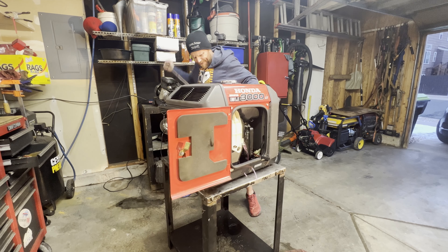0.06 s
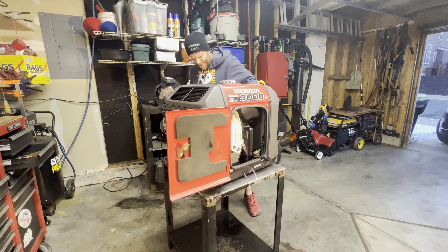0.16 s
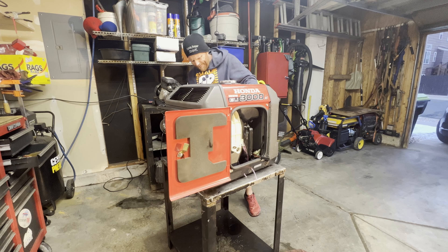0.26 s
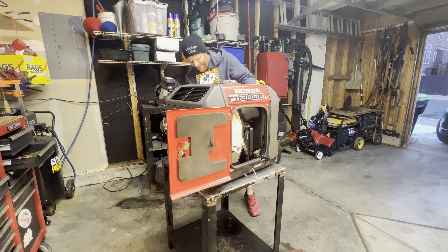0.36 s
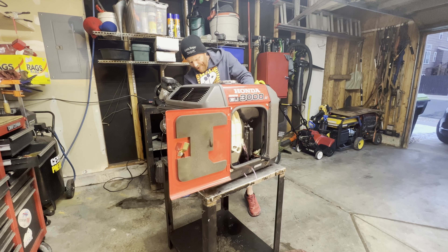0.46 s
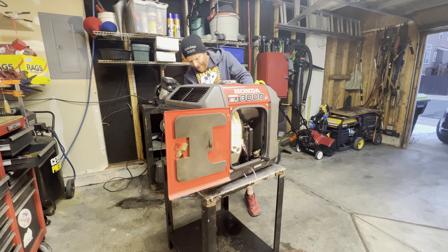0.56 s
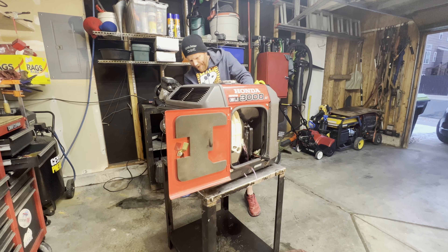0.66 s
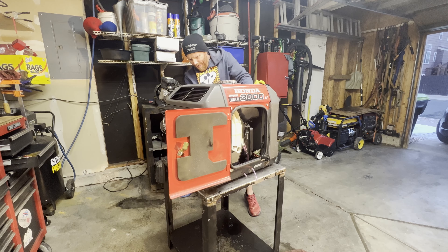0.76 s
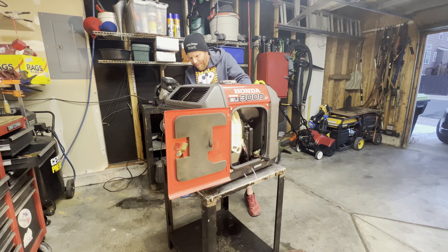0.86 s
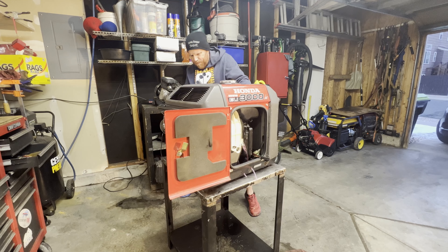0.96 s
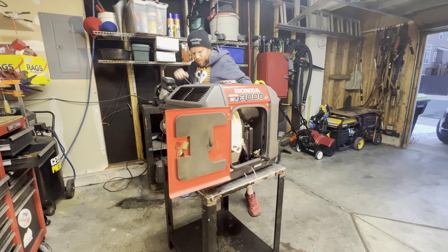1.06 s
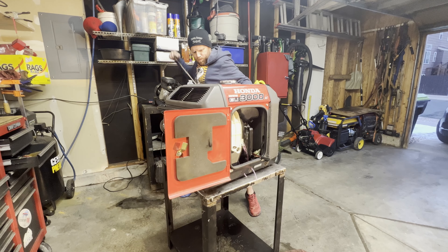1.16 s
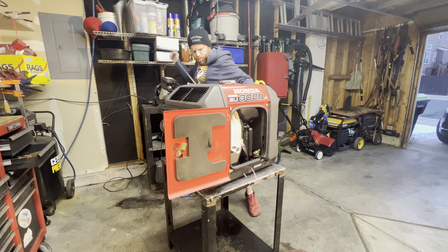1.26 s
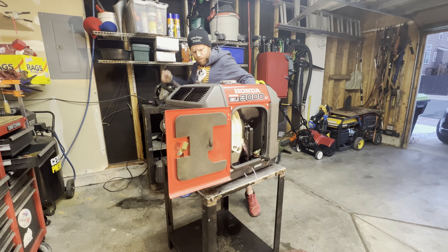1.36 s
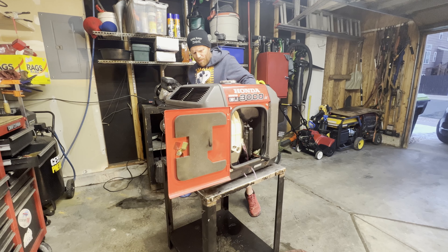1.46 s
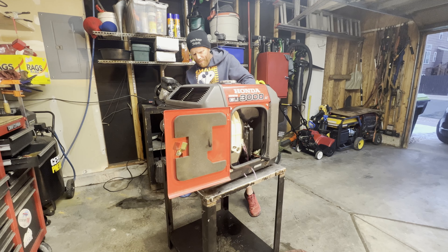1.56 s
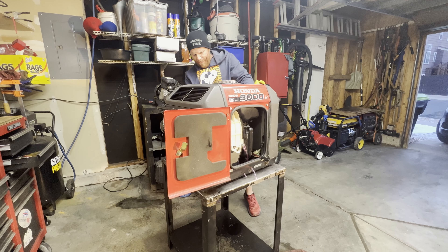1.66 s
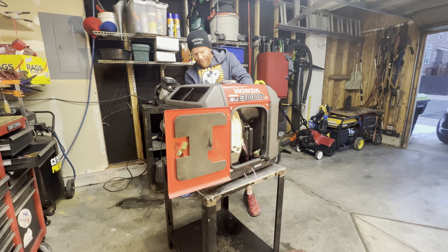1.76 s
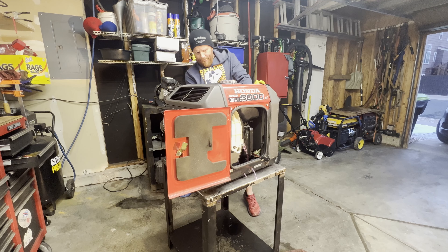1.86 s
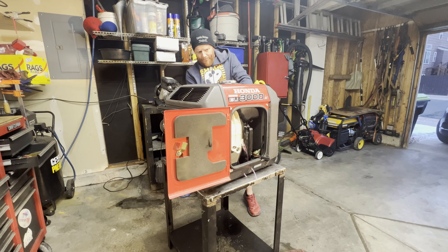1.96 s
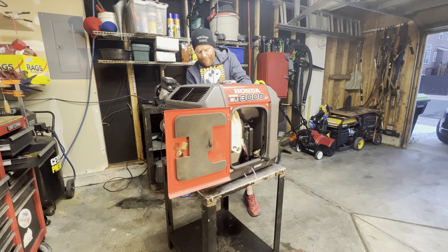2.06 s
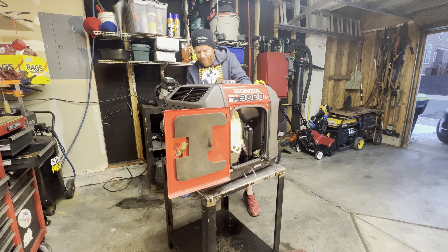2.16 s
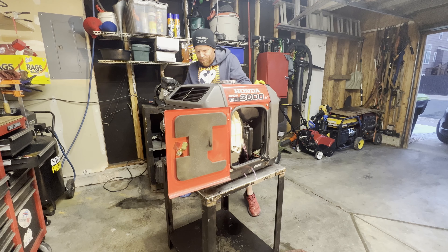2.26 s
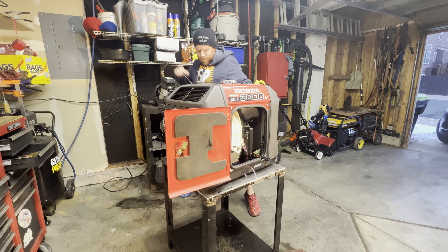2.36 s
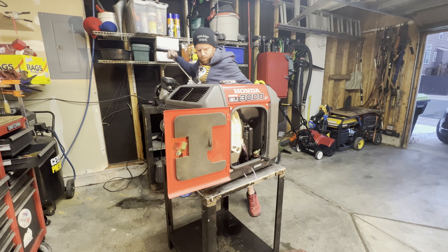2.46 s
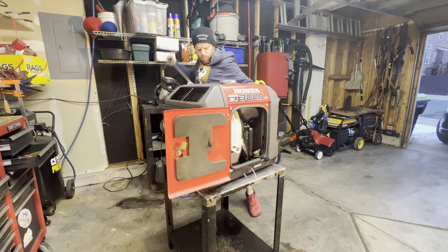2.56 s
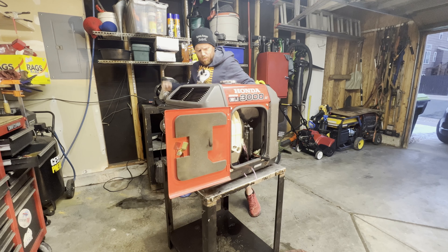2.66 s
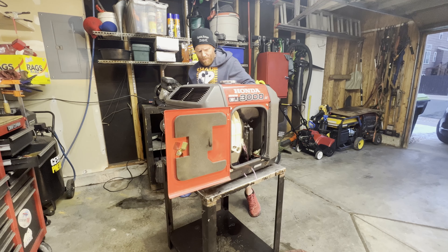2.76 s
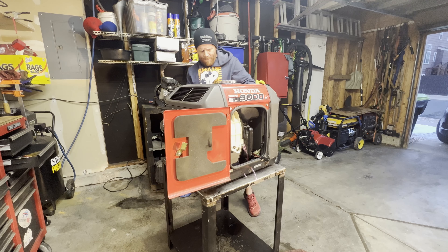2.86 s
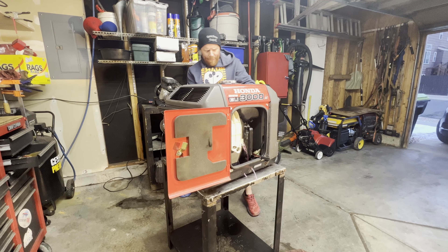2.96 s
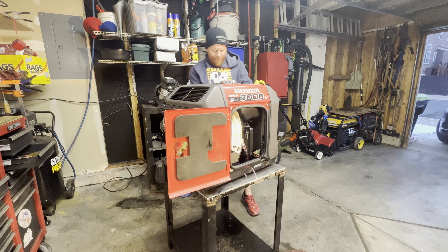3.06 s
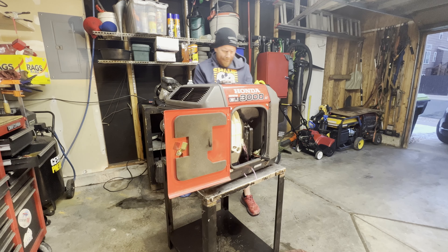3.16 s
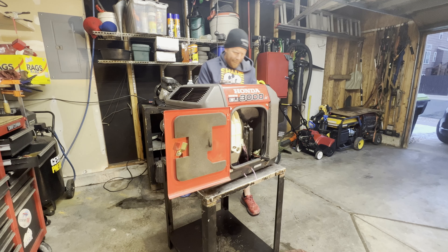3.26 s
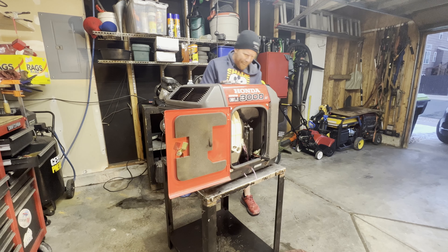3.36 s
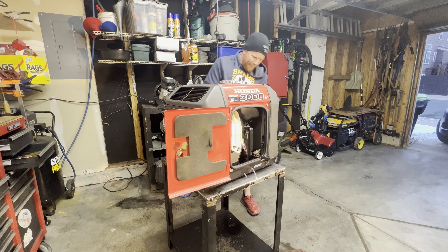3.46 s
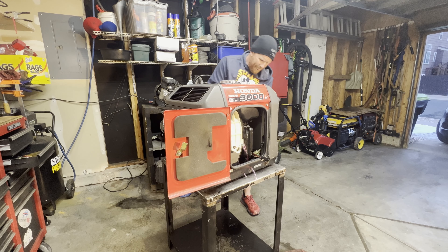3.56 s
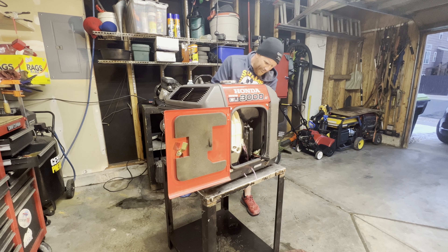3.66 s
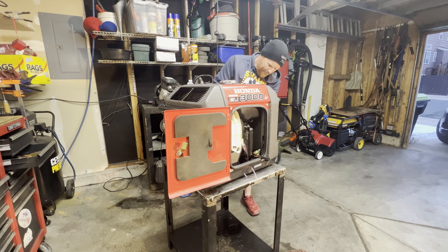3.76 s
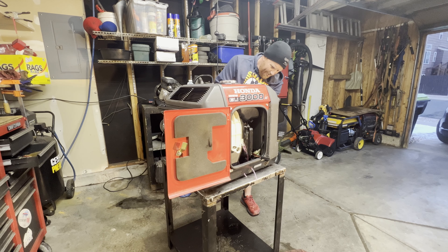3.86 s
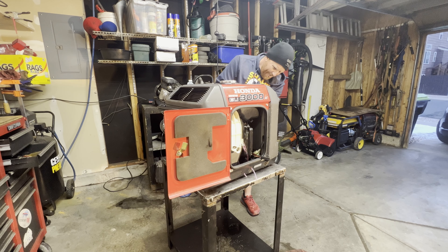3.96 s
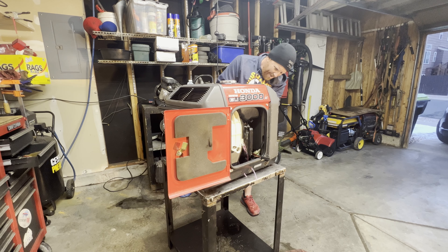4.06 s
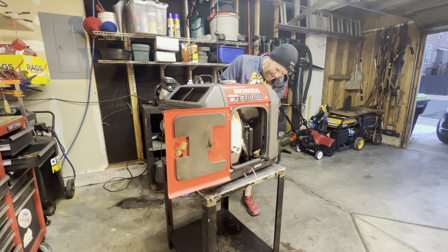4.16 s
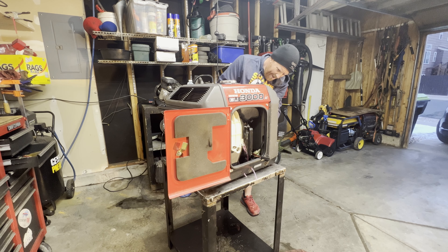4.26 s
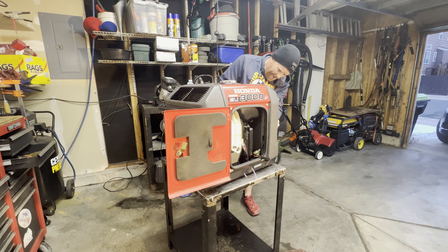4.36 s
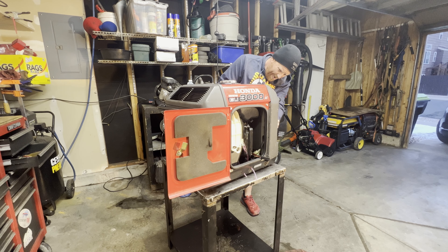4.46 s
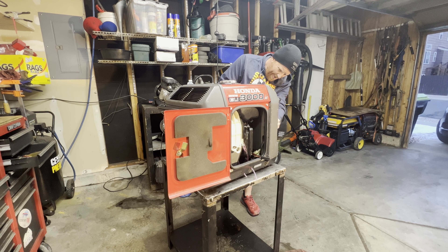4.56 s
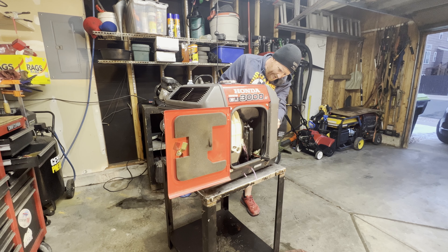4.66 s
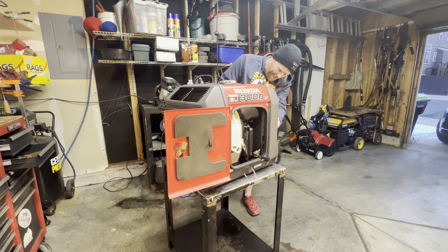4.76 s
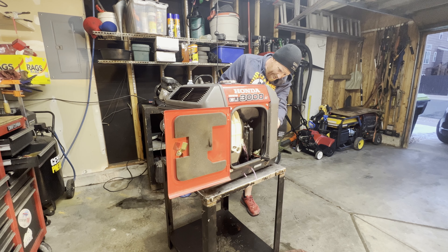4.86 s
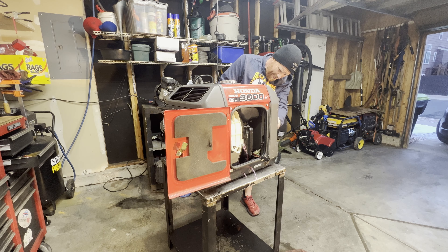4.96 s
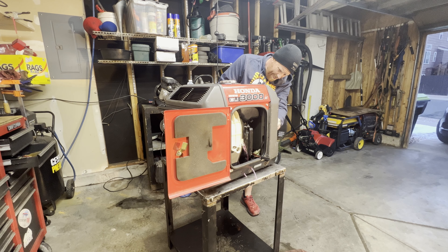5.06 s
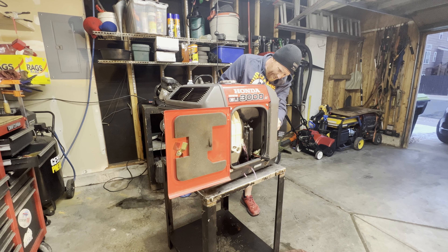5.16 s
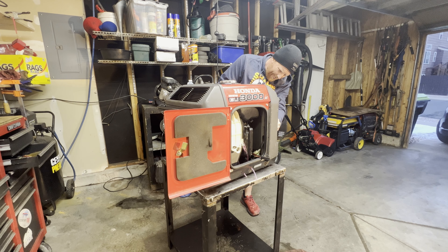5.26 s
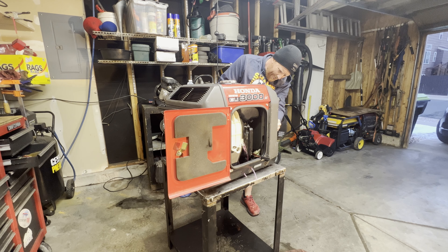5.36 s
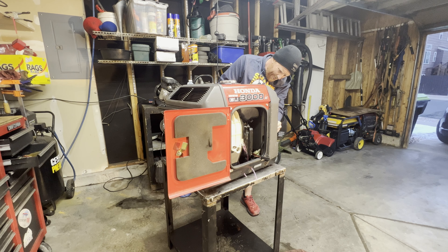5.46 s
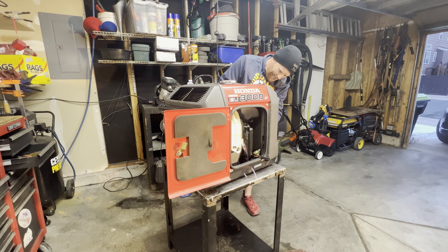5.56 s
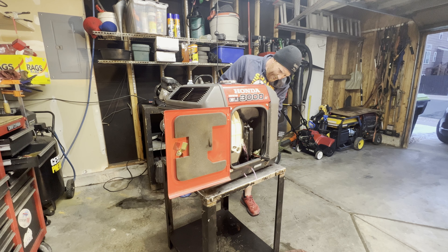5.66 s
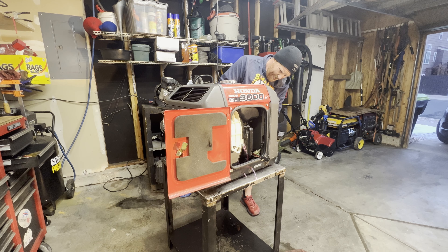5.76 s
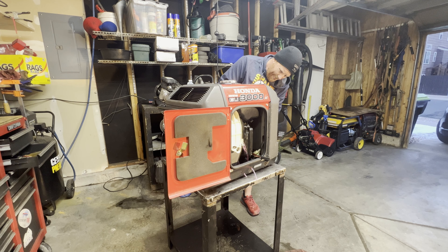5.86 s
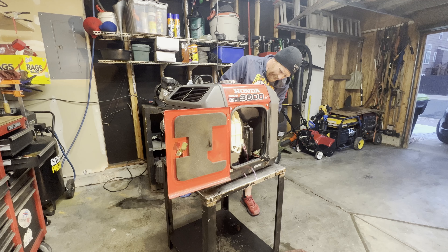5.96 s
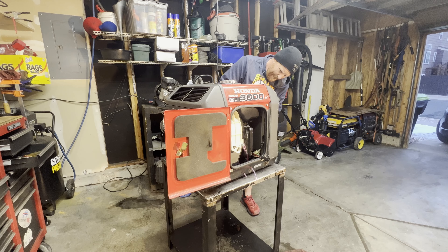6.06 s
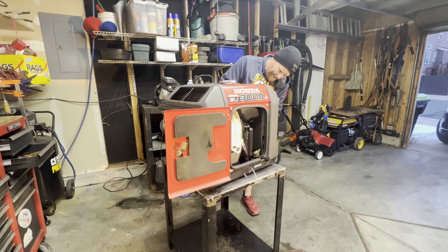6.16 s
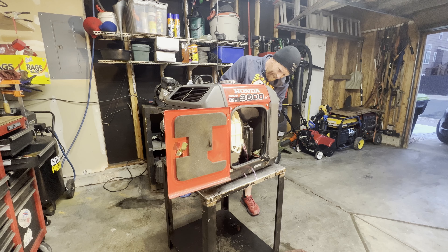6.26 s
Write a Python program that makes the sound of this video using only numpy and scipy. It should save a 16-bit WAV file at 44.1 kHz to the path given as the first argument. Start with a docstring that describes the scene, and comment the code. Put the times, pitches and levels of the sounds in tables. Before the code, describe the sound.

Stereo sound, near the machine with a short room ring: three failed starter pulls, the first caught midway. Cord rasp, steel reel jingle, rattling panels and puffing cylinder swell and sink under a gliding rotor whine. Dull thumps and a zinging rewind separate the pulls. After a final heavy clank everything settles quickly into quiet air, soft rumble and wavering hum, with a few tiny knocks.

```python
"""In a garage, someone pulls a small generator's cord three times, but it does not start; pull one is under way.
Before the later pulls the starter pawls clack in (noise bursts), then cord and reel rasp (noise and random taps).
The rotor whines up and coasts down (gliding sines) while the cylinder pumps air (noise in cavities).
The last pull ends in a kick; small knocks, rubs and ticks follow (short noises through resonances).
Still air, a low rumble (both noise) and a wavering hum (sines) lie underneath."""
import sys
import numpy as np
from scipy import signal
from scipy.fft import rfft, irfft, next_fast_len
from scipy.io import wavfile
from scipy.ndimage import map_coordinates

SR = 44100
rng = np.random.default_rng(int(sys.argv[2]) if len(sys.argv) > 2 else 0)


def pcm_store(signal):
    """Save signal as 16-bit PCM."""
    levels = np.round(np.clip(np.atleast_2d(signal), -1, 1) * 32767)
    wavfile.write(sys.argv[1], SR, levels.astype(np.int16).T)


N = 277808

# In tables of f/Hz, levels only set the balance inside that sound, except for HUM_TONES.
# still air: f/Hz, level per Hz/dB
AIR_COLOUR = [(15, -38.5), (25, -15), (129, -2.5), (169, -13), (233, -8), (340, -15.5), (631, -21),
              (1270, -28.5), (1850, -21.5), (2420, -36.5), (7700, -38.5), (8350, -37), (15500, -54.5)]
# low rumble: f/Hz, level per Hz/dB
RUMBLE_COLOUR = [(25, -23), (62, 0), (92, -5), (125, 3.5), (165, -10.5), (240, -11), (320, -23.5),
                 (900, -43), (4000, -88.5)]
# how the rumble's level moves, before its offset: t/s, level/dB
RUMBLE_LEVEL = [(3.7, -59), (4.34, -62), (6.3, -59.5)]
# hum tones, before their offset: f/Hz, level/dB
HUM_TONES = [(70.0, -80.5), (118.4, -65), (193.8, -72.5)]
# how alike left and right are: f/Hz, likeness (0 to 1)
LIKENESS = [(60, 0.89), (160, .93), (300, 0.77), (500, .25), (1000, 0.17), (2000, .42), (4000, 0.17),
            (8000, 0), (12000, 0.46)]
# left minus right: f/Hz, level/dB
LEFT_RIGHT = [(100, -0.5), (400, -3.5), (800, 0.5), (1300, 0), (2400, 0), (4400, 4), (8000, 4),
              (12000, 0.5)]
# how long the garage rings: f/Hz, time to fall 60 dB/s
GARAGE_DECAY = [(100, .55), (500, 0.64), (2000, 0.34), (5000, 0.36), (12000, 0.19)]
# cord, spring and later hands chafe on the case: t/s, level/dB, f/Hz, width/Hz, length/s
CHAFES_ON_CASE = [(0.026, -25.5, 762, 51.3, 0.027), (0.373, -33.5, 680, 169.6, 0.031),
                  (.74, -49.5, 469.6, 60, .045), (1.401, -33, 720.7, 170.7, 0.052),
                  (1.771, -38, 3195, 700, .035), (2.3, -34.5, 800, 40.23, 0.064),
                  (2.745, -35.5, 824, 50.2, 0.045), (3.015, -24.5, 425, 49.98, .025),
                  (3.157, -34.5, 469, 50.5, 0.031), (3.312, -34.5, 463, 45.3, 0.015),
                  (4.459, -65, 418, 300, 0.051), (4.719, -72, 445, 700, .08),
                  (5.123, -62.5, 444, 198, 0.096)]
# ticks of the handle and loose parts, one ringing mode a row: t/s, level/dB, f/Hz, width/Hz, 60 dB fall/s
LOOSE_TICKS = [(.63, -52.5, 13500, 4000, .06), (1.934, -48, 13200, 4070, .09), (3.98, -72, 5210, 1200, .15),
               (4.026, -73, 11000, 6020, 0.031), (4.848, -53.5, 513, 120.2, .2),
               (4.85, -61.5, 2680, 595.5, 0.26), (4.85, -59, 8600, 600, 0.31),
               (5.088, -70, 3090, 299.5, 0.11), (5.28, -74, 4000, 1304, .12),
               (5.391, -75.5, 11500, 4010, .025)]
# the engine rocks against compression and on its mounts: t/s, level/dB, 60 dB fall/s
ENGINE_THUDS = [(.444, -26, .22), (0.84, -28.5, 0.3), (1.755, -36.5, 0.18), (2.092, -33.5, 0.25),
                (3.003, -26, 0.28), (3.5, -42, 0.2), (4.848, -54, 0.4)]
# lighter knocks of reel, handle and case: t/s, level/dB, rise/s, 60 dB fall/s, brightness/Hz
LIGHT_KNOCKS = [(.749, -38, 0.00075, 0.052, 3470), (1.215, -29, 0.0044, 0.057, 3994),
                (1.748, -33.5, .01, 0.11, 4920), (3.075, -31, 0.01, 0.23, 3560),
                (3.2635, -35.5, 0.0018, 0.047, 5500), (3.29, -39.5, .005, .12, 1900),
                (3.398, -51, .0033, .08, 3400), (3.492, -48, 0.0027, 0.14, 620),
                (3.743, -63, .012, .13, 1500), (4.433, -67, .012, .12, 2800),
                (4.846, -51.5, 0.0018, 0.098, 7980)]
# the pawls clack into the flywheel: t/s, level/dB, 60 dB fall/s
PAWL_CLACKS = [(0.8052, -12.5, .022), (2.0466, -17, 0.033)]
# the cord jerks taut or the engine kicks back: t/s, level/dB, rise/s, 60 dB fall/s, clash brightness/Hz
CASE_JOLTS = [(0.8392, -17.5, .0025, .055, 14100), (2.092, -19.5, 0.0068, 0.025, 8900),
              (2.995, -16.5, 0.0015, 0.066, 9000)]
# a dull thud: f/Hz, level per Hz/dB
THUD_COLOUR = [(45, -22.5), (68, -13), (98, -14), (145, 2), (270, 0.5), (450, 1), (750, -12.5), (2000, -32),
               (6000, -67)]
# a hard blow: f/Hz, level per Hz/dB
BLOW_COLOUR = [(100, -30), (300, -14), (480, -1), (640, -6.5), (820, -1.5), (1150, 1.5), (1450, -5.5),
               (1700, -4.5), (2500, -8.5), (3300, -11.5), (5000, -14.5), (9000, -14), (11000, -20.5),
               (13000, -10.5), (16000, -25.5)]
# case panels: f/Hz, width/Hz, level/dB
CASE_PANELS = [(445, 88, 3), (517, 60, 3.5), (771, 22, 3), (920, 240, -7), (1060, 190, -3.5), (1390, 43, 0),
               (1680, 160, -15.5), (1710, 80, -5.5), (2160, 260, -5.5)]
# intake and muffler cavities: f/Hz, width/Hz, level/dB
AIR_CAVITIES = [(69.6, 14, 1.5), (139, 16, 4.5), (207, 79, 0.5), (263, 91, -0.5), (357, 61, -2)]
# the rattling case: f/Hz, level per Hz/dB
RATTLE_COLOUR = [(200, -16), (380, -7), (560, 2), (660, -3), (820, 1), (1350, 3), (2000, -4.5),
                 (2600, -8.5), (4000, -33)]
# the sliding cord: f/Hz, level per Hz/dB
CORD_COLOUR = [(1500, -20), (2700, -1.5), (3500, -1.5), (4300, -4), (6500, -1.5), (9000, -3.5), (10200, -6),
               (10900, -15.5), (12000, -8), (15500, -11)]
# thin steel parts of the spinning reel: f/Hz, width/Hz, level/dB, left minus right/dB
REEL_STEEL = [(3266, 28, 3.5, -3.5), (3480, 160, -5.5, 2.5), (5020, 67, -3.5, 6), (5554, 60, 1.5, 5.5),
              (5840, 220, -8, 1.5), (7320, 190, -21, 2), (7970, 73, 0, 5.5), (8275, 190, 1.5, 2),
              (9850, 130, -10.5, -3.5)]
# the pulls: cord taut t/s, fastest t/s, engine stalls t/s, cord home t/s, level/dB,
# coasting loss/dB per s, top whine f/Hz, slowing/Hz per s, whine fades below f/Hz
CORD_PULLS = [(-.4, -0.026, 0.38, 0.61, -27.5, 20.5, 463.4, 297, 410),
              (0.838, 1.178, 1.755, 1.945, -27.5, 17.5, 553.6, 560, 390),
              (2.089, 2.492, 3.003, 3.1, -27, 17.5, 601.6, 700, 354.6)]


def amp(db):
    """Turn decibels into a gain."""
    return 10 ** (np.asarray(db) / 20)


def unit(x):
    """Scale x to an rms (average strength) of 1."""
    return x / np.sqrt(np.mean(x ** 2) + 1e-20)


def along(points, hz):
    """Read a table of (f/Hz, value) at any frequency, on a log axis."""
    f, values = np.transpose(points)
    return np.interp(np.log(hz + 1), np.log(f + 1), values)


def curves(rows):
    """Draw one value per sample for each column after the time."""
    times, *columns = np.transpose(rows)
    return [np.interp(np.arange(N) / SR, times, column) for column in columns]


def wobble(rate):
    """Draw a smooth random curve with rate random points a second."""
    points = rng.standard_normal(int(N * rate / SR) + 4)
    return map_coordinates(points, [np.arange(N) * rate / SR])


def since(s):
    """Count the seconds gone by since time s, zero before it."""
    return np.maximum(np.arange(N) / SR - s, 0)


def surge(s, rise, t60):
    """A gain that swells from time s and dies away, losing 60 dB every t60 seconds."""
    return (1 - np.exp(-(since(s) / rise) ** 2)) * amp(-60 * since(s) / t60)


def filtered(x, response):
    """Multiply the spectrum of x by a response of frequency."""
    size = x.shape[-1]
    padded = next_fast_len(size + SR // 4)
    spectrum = rfft(x, padded) * response(np.fft.rfftfreq(padded, 1 / SR))
    return irfft(spectrum, padded)[..., :size]


def resonance(f, hz, width):
    """Response of one damped mode: the narrower it is, the longer it rings."""
    return 1j * f * width / (hz * hz - f * f + 1j * f * width)


def body(modes, f):
    """Response of a set of modes, added with alternating sign."""
    return sum((-1) ** k * amp(db) * resonance(f, hz, width) for k, (hz, width, db) in enumerate(modes))


def panned(db):
    """Left and right gains for a level difference; above zero, left is louder."""
    return amp(np.array([[.5], [-.5]]) * db)


def rush(response, size=N):
    """Coloured stereo noise of rms 1, with the likeness and lean of left and right set by frequency."""
    padded = next_fast_len(size)
    f = np.fft.rfftfreq(padded, 1 / SR)
    # this angle splits the noise between a shared and an opposed part
    angle = np.arccos(np.clip(along(LIKENESS, f), -1, 1)) / 2
    mid, side = rfft(rng.standard_normal((2, padded))) * [np.cos(angle), np.sin(angle)]
    pair = np.array([mid + side, mid - side]) * response(f) * panned(along(LEFT_RIGHT, f))
    return unit(irfft(pair, padded)[:, :size])


def burst(response, rise, t60):
    """A blow scattered among many close modes: noise that swells, then dies away."""
    t = np.arange(SR // 2) / SR
    shape = (1 - np.exp(-(t / rise) ** 2)) * amp(-60 * t / t60)
    shape = shape / shape.max()
    noise = shape * rush(response, size=len(t))
    return unit(noise) * np.sqrt(np.mean(shape ** 2))


def add(track, s, sound):
    """Mix a sound into the track at time s."""
    part = track[:, max(round(s * SR), 0):][:, :sound.shape[1]]
    part += sound[:, :part.shape[1]]


def garage(x, wet_db):
    """Add the room's answer: a tail of noise in which each frequency dies at its own speed."""
    hz, t, z = signal.stft(rush(np.ones_like, size=SR), SR, nperseg=256)
    decay = amp(-60 * t / along(GARAGE_DECAY, hz)[:, None])
    tail = signal.istft(z * decay, SR, nperseg=256)[1]
    # the tail begins 5 ms after the sound; the left channel feeds it
    tail = np.pad(tail / np.linalg.norm(tail[0]), ((0, 0), (SR // 200, 0)))
    return x + amp(wet_db) * signal.fftconvolve(x[:1], tail, axes=1)[:, :N]


def background(air_db=-67, rumble_offset_db=-3, hum_offset_db=-2, swell_db=2):
    """Still air, a low rumble that swells and sinks, and a hum whose level and phase waver."""
    t = np.arange(N) / SR
    hum = 0
    for hz, db in HUM_TONES:
        level = amp(db + hum_offset_db + 1.2 * wobble(4.2))
        hum = hum + level * np.sqrt(2) * np.sin(2 * np.pi * hz * t + 0.78 * wobble(1.9))
    rumble_level = amp(curves(RUMBLE_LEVEL)[0] + rumble_offset_db + swell_db * wobble(7))
    rumble = rumble_level * rush(lambda f: amp(along(RUMBLE_COLOUR, f)))
    air = amp(air_db) * rush(lambda f: amp(along(AIR_COLOUR, f)))
    return (hum + rumble) * panned(-2) + air


def small_parts():
    """Rubbing sets one resonance groaning; loose metal ticks and rings."""
    track, t = np.zeros((2, N)), np.arange(SR // 2) / SR
    for s, db, hz, width, length in CHAFES_ON_CASE:
        start = max(s - t.mean(), 0)
        swell = np.exp(-2 * ((start + t - s) / length) ** 2)  # loudest at time s
        noise = rush(lambda f: resonance(f, hz, width) ** 2, size=len(t))
        groan = unit(swell * noise) * np.sqrt(np.mean(swell ** 2))
        add(track, start, amp(db) * groan)
    for s, db, hz, width, t60 in LOOSE_TICKS:
        tick = burst(lambda f: resonance(f, hz, width), 0.001, t60)
        add(track, s, amp(db) * tick)
    return garage(track, wet_db=-7.0)


def contacts(clack_rise_s=0.0018, clack_hz=2420, jolt_hz=2060,
             clash_delay_s=.0045, clash_db=-19, clash_rise_s=.006, clash_t60_s=.048):
    """List all hard contacts like LIGHT_KNOCKS; a jolt is a dull blow, then a clash of the reel's steel."""
    clacks = [(s, db, clack_rise_s, t60, clack_hz) for s, db, t60 in PAWL_CLACKS]
    jolts = [(s, db, rise, t60, jolt_hz) for s, db, rise, t60, _ in CASE_JOLTS]
    clashes = [(s + clash_delay_s, clash_db, clash_rise_s, clash_t60_s, clash_hz)
               for s, *_, clash_hz in CASE_JOLTS]
    return clacks + jolts + clashes + list(LIGHT_KNOCKS)


def knocks(ring=0.22, boom=0.8):
    """Contacts ring the case, duller at low brightness; the rocking engine booms in the cavities."""
    track = np.zeros((2, N))
    for s, db, rise, t60, bright_hz in contacts():
        def blow(f):
            ringing = 1 + ring * abs(body(CASE_PANELS, f))
            return amp(along(BLOW_COLOUR, f)) * ringing / np.sqrt(1 + (f / bright_hz) ** 4)
        add(track, s, amp(db) * burst(blow, rise, t60))

    def thud(f):
        return amp(along(THUD_COLOUR, f)) * (1 + boom * abs(body(AIR_CAVITIES, f)))
    for s, db, t60 in ENGINE_THUDS:
        add(track, s, amp(db) * burst(thud, 0.0016, t60))
    return garage(track, wet_db=-3.0)


def rewind(db=-47, rise=.04, t60=0.29, spring_hz=6000, width_hz=160):
    """The return spring zings from the stall until the cord is home, then dies away."""
    gain = sum((1 - np.exp(-since(stall) / rise)) * amp(-60 * since(home) / t60)
               for _, _, stall, home, *_ in CORD_PULLS)
    return amp(db) * gain * rush(lambda f: resonance(f, spring_hz, width_hz))


def blow_down(db=-38, rise=0.055, t60=0.46):
    """At each stall against compression, trapped air escapes and booms in the deepest cavity."""
    hz, width, _ = AIR_CAVITIES[0]
    gain = sum(surge(stall, rise, t60) for _, _, stall, *_ in CORD_PULLS)
    return amp(db) * gain * rush(lambda f: resonance(f, hz, width) ** 2)


def rotor(spin_up_s=.29):
    """Whine pitch and its shortfall, both in Hz: a pull spins the rotor up, friction slows it evenly."""
    t, hz, short = np.arange(N) / SR, np.zeros(N), np.zeros(N)
    for taut, fastest, *_, top_hz, slowing, sing_hz in CORD_PULLS:
        speeding_up = top_hz * np.exp(-(np.minimum(t - fastest, 0) / spin_up_s) ** 2)
        spin = speeding_up - slowing * since(fastest)
        hz = np.where(t >= taut, np.maximum(spin, 0), hz)
        # how far the pitch lies below the one where the whine starts to fade
        short = np.where(t >= taut, np.maximum(sing_hz - hz, 0), short)
    return hz, short


def effort(full_db=-28.5, lead_s=.04, swell_db_per_s=36, rewind_db_per_s=45.5, settle_db_per_s=145):
    """Strength of the motion, 1 at full_db: it swells, coasts, rewinds and settles."""
    t, strength = np.arange(N) / SR, 0
    for taut, fastest, stall, home, db, coast, *_ in CORD_PULLS:
        peak = fastest - lead_s  # the arm's effort peaks just before the rotor's speed
        drop = swell_db_per_s * np.maximum(peak - t, 0)
        drop += coast * (since(peak) - since(stall))
        drop += rewind_db_per_s * (since(stall) - since(home))
        drop += settle_db_per_s * since(home)
        strength += (t >= taut) * amp(db - full_db - drop)
    return strength


def whine(rough=0.5, flutter_db=5, level_db=-33.0, fade_db_per_hz=0.34, grows=.35,
          strand=.8, strand_db=-10, come_go_db=5):
    """The rotor sings at a pitch set by its speed, unsteady from uneven drag; a lower strand comes and goes."""
    hz, short = rotor()
    phase = 2 * np.pi * np.cumsum(hz) / SR
    main = amp(flutter_db * np.tanh(wobble(45))) * np.sin(phase + rough * wobble(110))
    # the lower strand has 0.8 times the main pitch
    strand_gain = amp(strand_db + come_go_db * np.tanh(wobble(18)))
    lower = strand_gain * np.sin(strand * phase + rough * wobble(110))
    gain = amp(level_db - fade_db_per_hz * short) * effort() ** grows
    return garage((main + lower) * gain * panned(-3.5), wet_db=-5)


def reel(taps_per_s=5000):
    """A dense run of irregular taps keeps the steel parts of the reel ringing."""
    taps = (rng.random(N) < taps_per_s / SR) * rng.standard_normal((2, N))

    def steel(f):
        return sum((-1) ** k * amp(db) * panned(lean) * resonance(f, hz, width)
                   for k, (hz, width, db, lean) in enumerate(REEL_STEEL))
    return unit(filtered(taps, steel))


def first_slip(db=-40, reel_db=-2, rise=.015, t60=.35):
    """Just after the pawls catch, the cord starts to slide and the reel to ring."""
    gain = amp(db) * sum(surge(s, rise, t60) for s, *_ in PAWL_CLACKS)
    cord = rush(lambda f: amp(along(CORD_COLOUR, f)))
    return gain * (cord + amp(reel_db) * reel())


def chatter(per_s=70, t60=0.09, depth=0.66):
    """Gain of a loose part that jumps at random moments and settles."""
    jumps = (rng.random(N) < per_s / SR) * rng.random(N)
    decay = amp(-60 * np.arange(SR // 10) / SR / t60)
    settling = signal.fftconvolve(jumps, decay)[:N]
    return unit(1 + depth * unit(settling))


def shudder(start_s=3.06, db=-5, rise=.025, t60=.8):
    """Gain of the rattle that goes on in the case after the last kick."""
    return amp(db) * surge(start_s, rise, t60)


def cranking(cord_db=-31, reel_db=-30.5, rattle_db=-32, panel_db=-33, pump_db=-40.5, throb_db=1.5,
             jitter_db=0.15, whine_cycles_per_turn=21, reel_grows=0.96, rattle_grows=0.92, pump_grows=.8):
    """Cord and reel rasp, the case rattles, the cylinder pumps air once a turn; all grow with the effort."""
    drive = effort()
    turn = np.sin(2 * np.pi * np.cumsum(rotor()[0]) / whine_cycles_per_turn / SR)
    jitter = jitter_db * wobble(200)
    cord = amp(cord_db + jitter) * rush(lambda f: amp(along(CORD_COLOUR, f)))
    case = amp(rattle_db) * rush(lambda f: amp(along(RATTLE_COLOUR, f)))
    case = case + amp(panel_db) * rush(lambda f: body(CASE_PANELS, f))

    def cavities(f):
        low_cut = f ** 4 / (f ** 4 + 40 ** 4)
        return body(AIR_CAVITIES, f) / (1 + (f / 520) ** 4) * low_cut
    pump = amp(pump_db + throb_db * turn) * rush(cavities)
    shaking = drive ** rattle_grows + shudder()
    rattle = shaking * amp(jitter) * chatter() * case
    spinning = drive ** reel_grows * amp(reel_db) * reel()
    return drive * cord + spinning + rattle + drive ** pump_grows * pump


def scene():
    """Mix the generator and its garage."""
    surroundings = background() + small_parts() + knocks()
    return surroundings + rewind() + blow_down() + whine() + first_slip() + cranking()


def record(dry, top_hz=15760):
    """Keep nothing at or above the top frequency."""
    return filtered(dry, lambda f: f < top_hz)


dry = scene()
out = record(dry)
pcm_store(out)
```